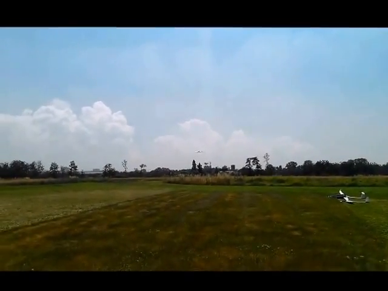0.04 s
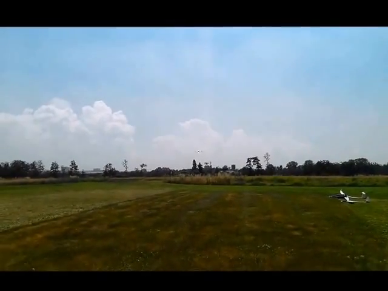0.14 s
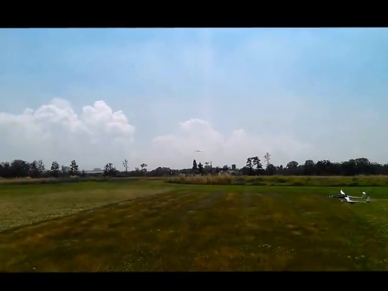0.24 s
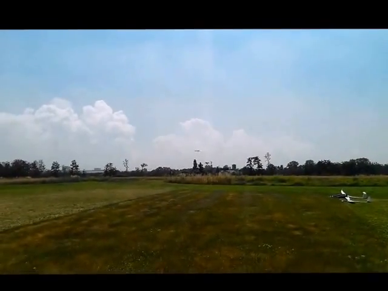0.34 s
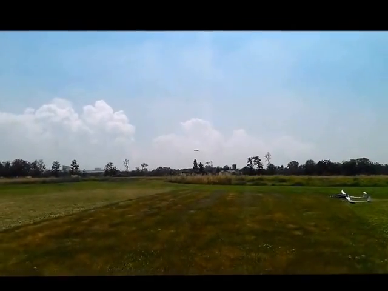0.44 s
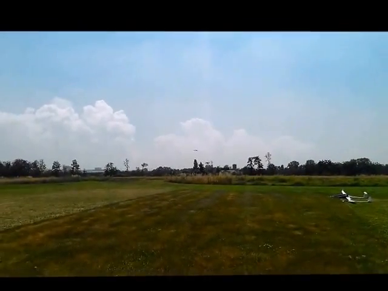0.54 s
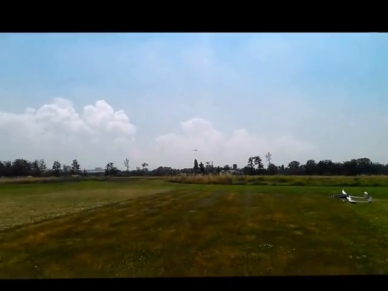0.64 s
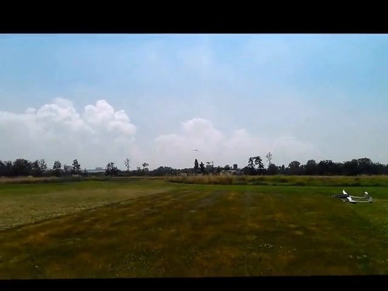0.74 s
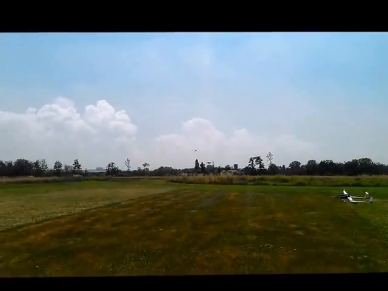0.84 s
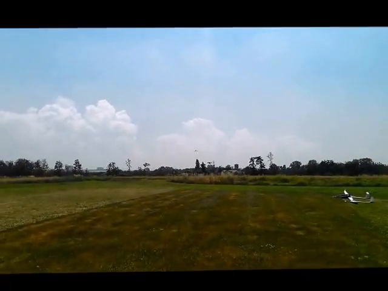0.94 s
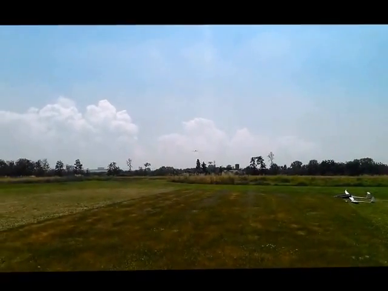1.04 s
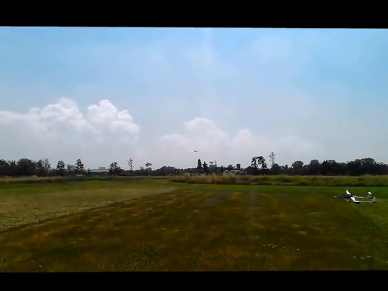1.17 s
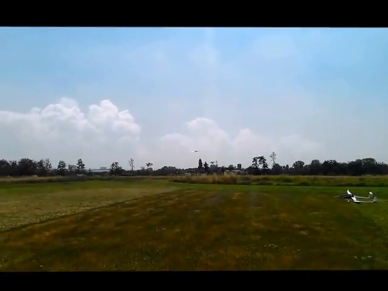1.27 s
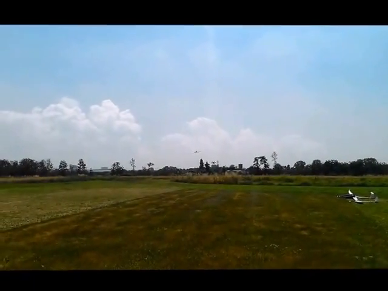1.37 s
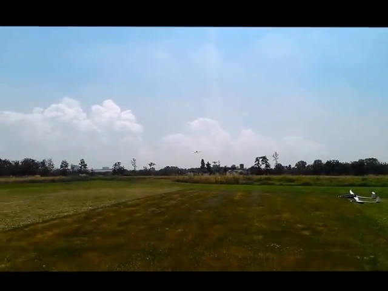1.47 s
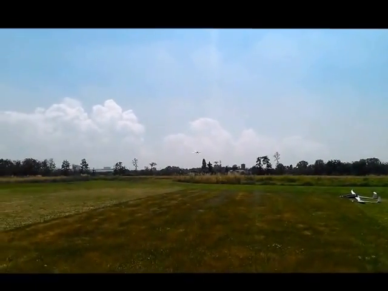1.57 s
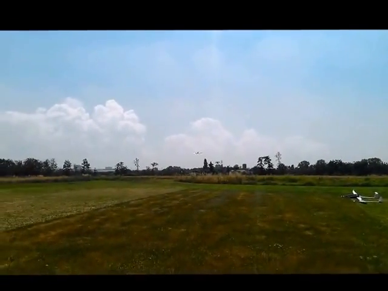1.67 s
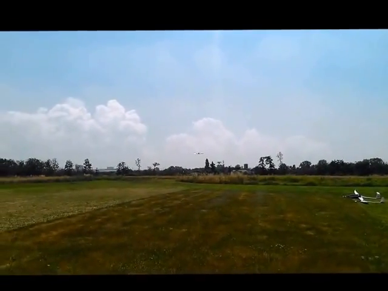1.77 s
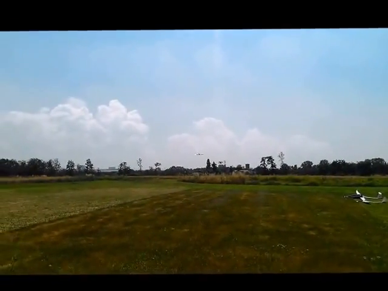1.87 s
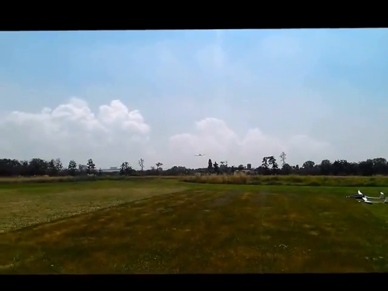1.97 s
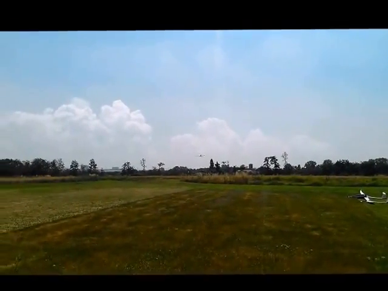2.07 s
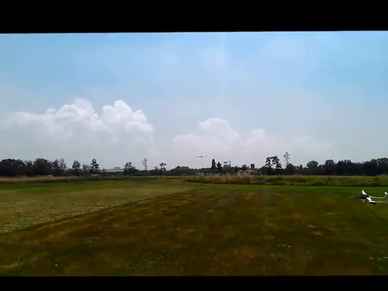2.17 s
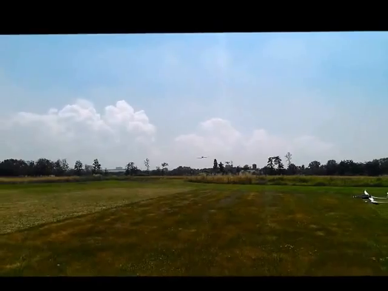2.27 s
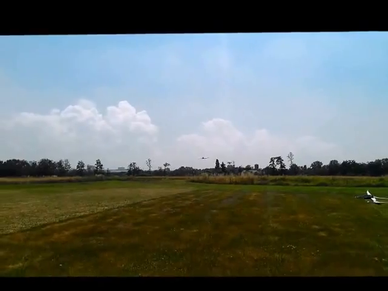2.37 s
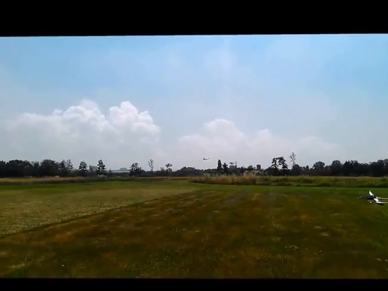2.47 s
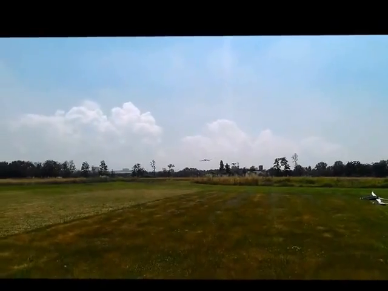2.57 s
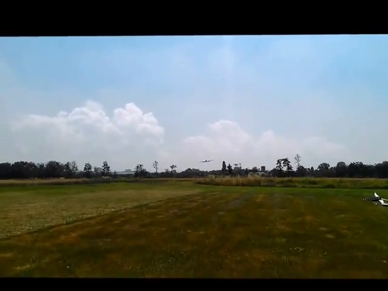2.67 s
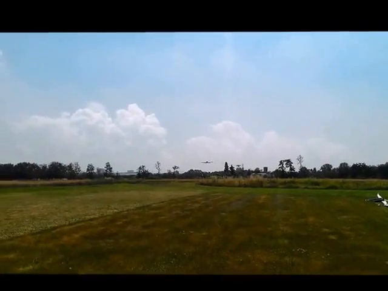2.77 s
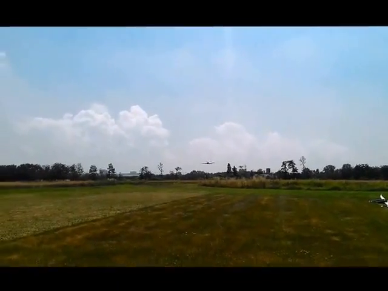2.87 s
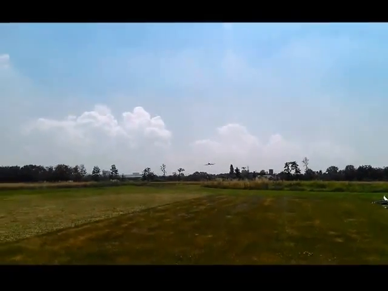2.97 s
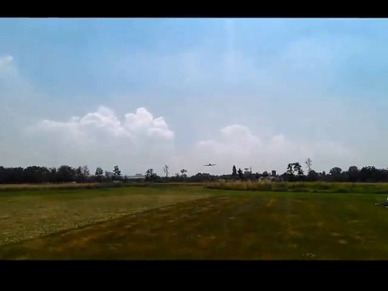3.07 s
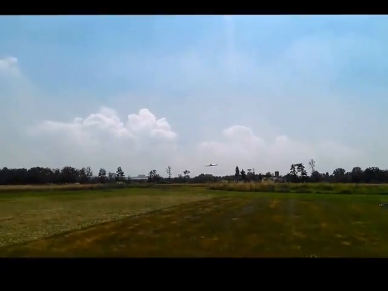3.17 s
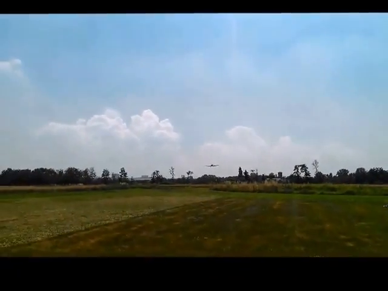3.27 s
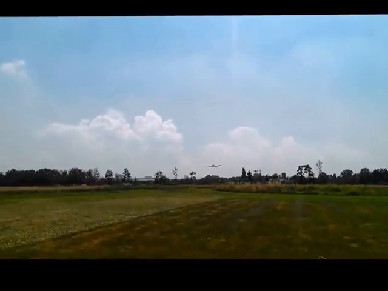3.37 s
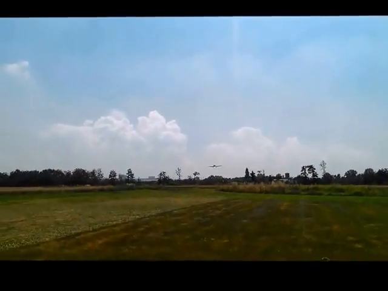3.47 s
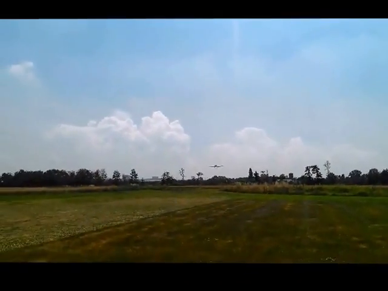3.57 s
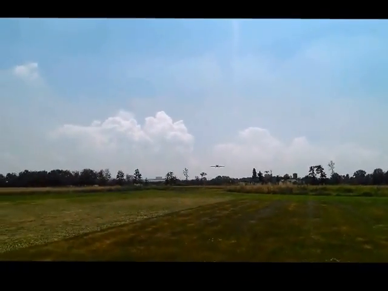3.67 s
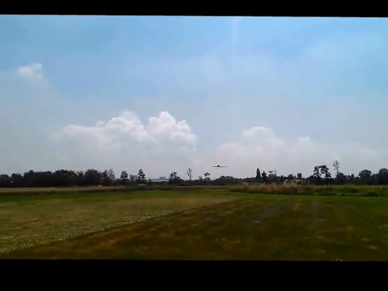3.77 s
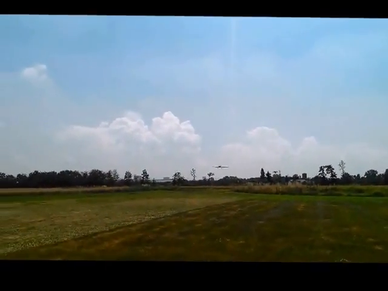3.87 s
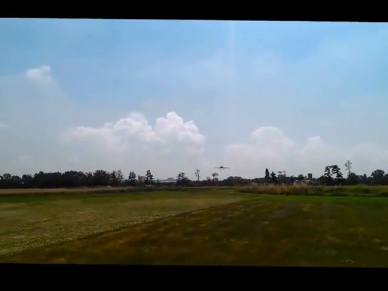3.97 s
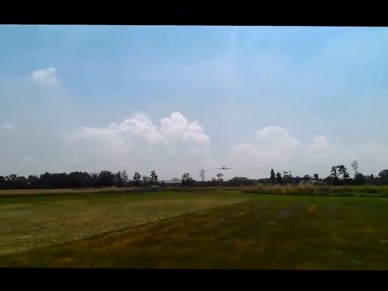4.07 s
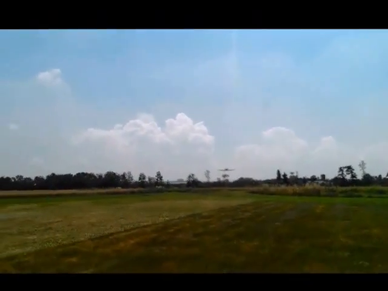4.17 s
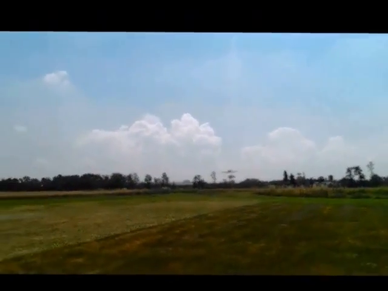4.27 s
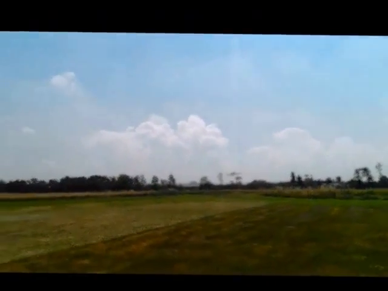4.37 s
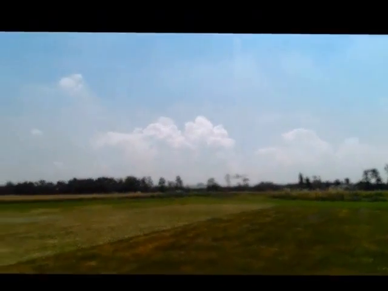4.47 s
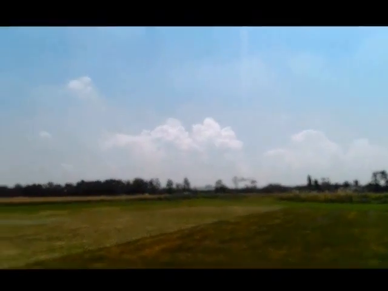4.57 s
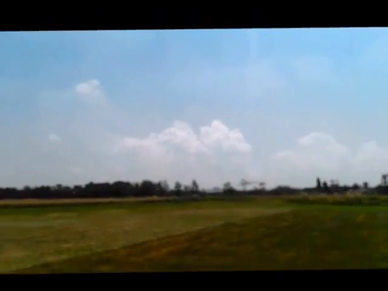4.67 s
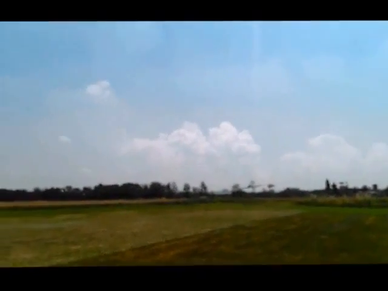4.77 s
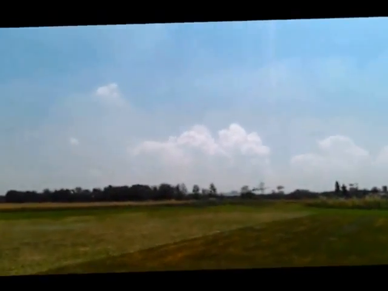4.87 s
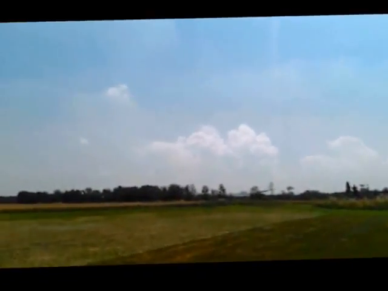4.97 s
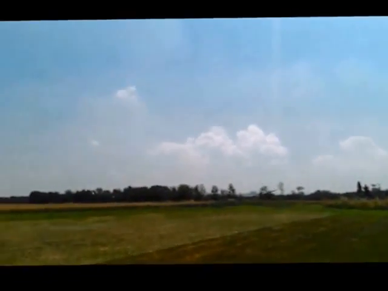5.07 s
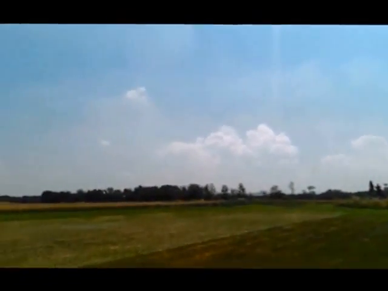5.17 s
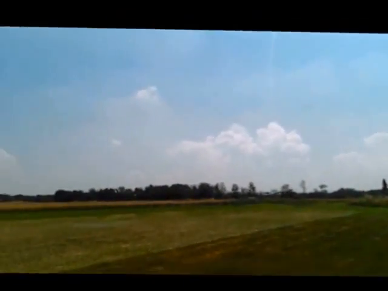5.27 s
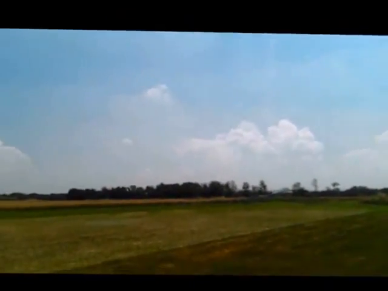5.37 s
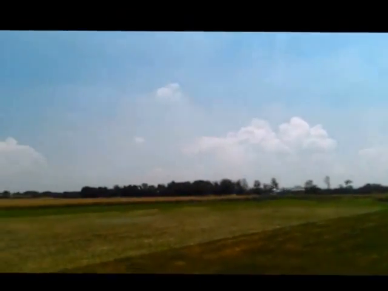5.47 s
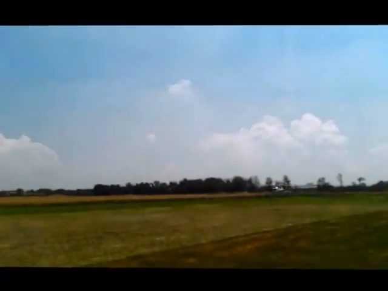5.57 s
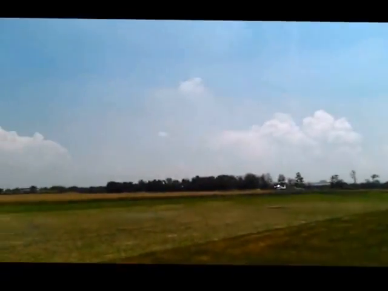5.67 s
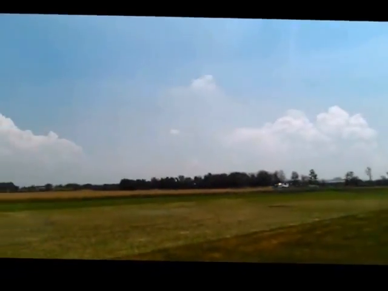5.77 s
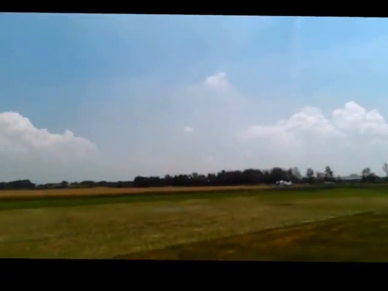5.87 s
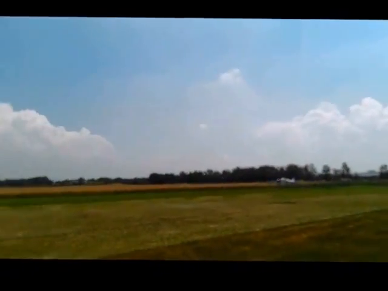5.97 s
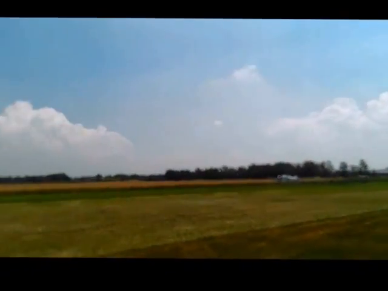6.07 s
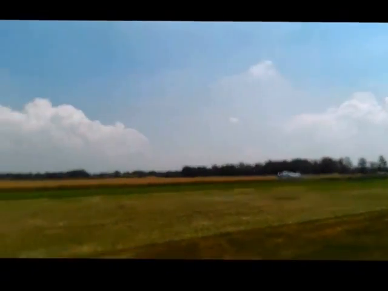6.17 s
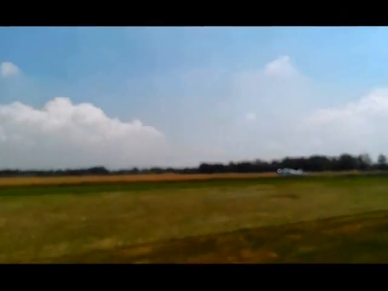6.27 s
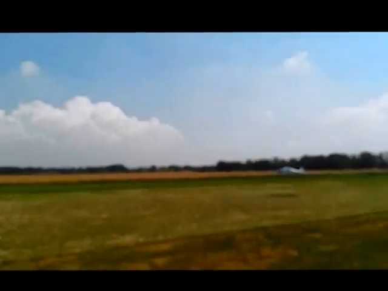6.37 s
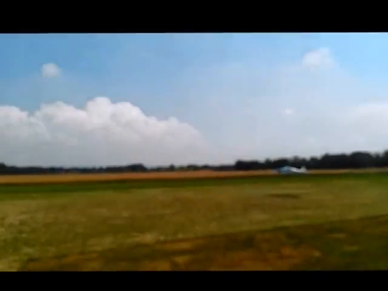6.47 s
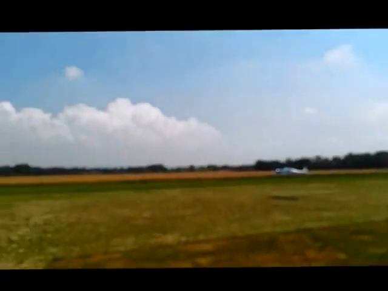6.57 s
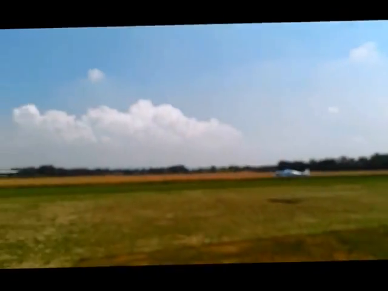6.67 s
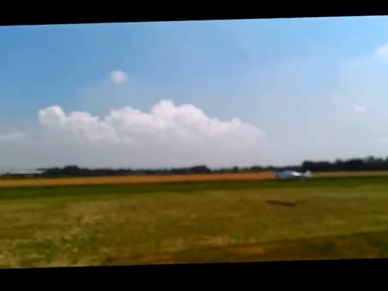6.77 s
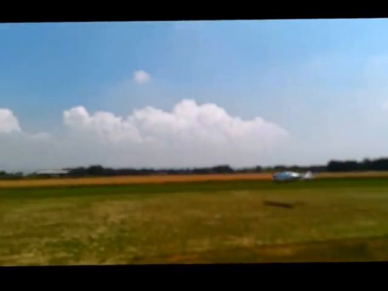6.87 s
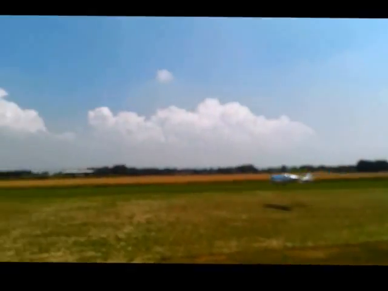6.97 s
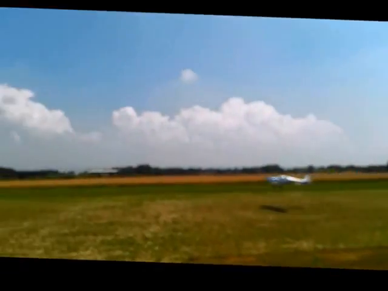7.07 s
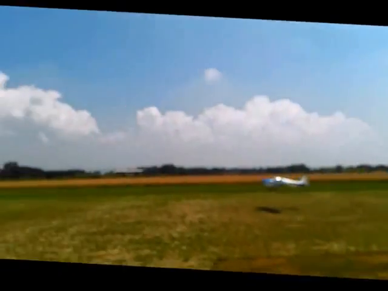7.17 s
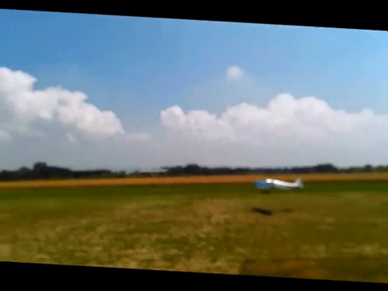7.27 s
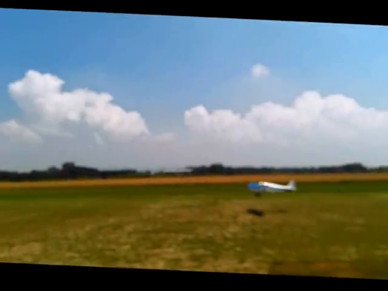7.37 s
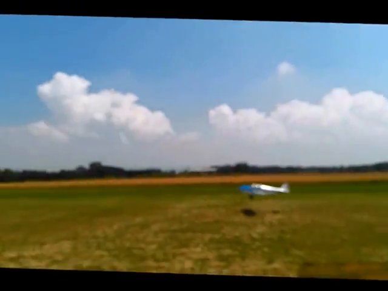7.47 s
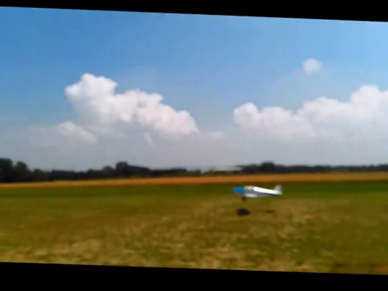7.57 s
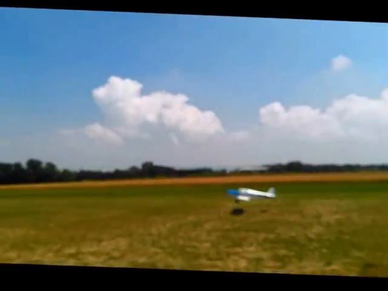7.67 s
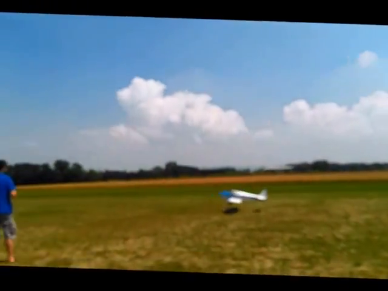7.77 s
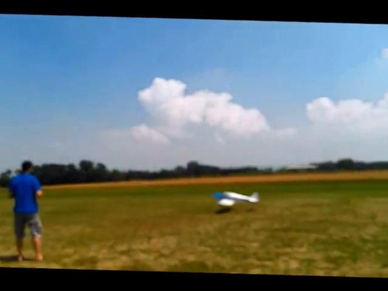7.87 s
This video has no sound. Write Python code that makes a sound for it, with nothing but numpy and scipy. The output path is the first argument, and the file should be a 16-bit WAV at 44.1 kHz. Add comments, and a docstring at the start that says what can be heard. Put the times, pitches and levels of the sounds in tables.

```python
"""The uneven popping of a small single-cylinder model aircraft engine runs throughout, idling towards
a landing over a grass field and coming nearer. It fires only every few turns: each firing pops and
thuds, the cold turns between puff through the muffler, and clicks and noise ring the airframe.
Wind buffets the two microphone ports, the left one far more: gusts of low lumpy noise, a ragged
flutter and a few knocks. A faint steady floor of field and microphone noise lies beneath."""
import sys
import numpy as np
from scipy import signal
from scipy.fft import rfft, irfft
from scipy.io import wavfile
from scipy.ndimage import uniform_filter1d

SR = 44100
rng = np.random.default_rng(int(sys.argv[2]) if len(sys.argv) > 2 else 0)


def generate_wav(sig):
    """Save sig (samples, or channels by samples) to the path in sys.argv[1] as 16-bit PCM at SR."""
    pcm = np.round(np.clip(np.atleast_2d(sig).T, -1, 1) * 32767).astype(np.int16)
    wavfile.write(sys.argv[1], SR, pcm)


N = 349713
TIME = np.arange(N) / SR  # seconds

# Firings of the engine. Each row: time in seconds (the pop's front is slightly later), relative strength in dB.
FIRINGS = [(0.073, -42), (0.161, -41.5), (0.266, -45), (0.355, -43), (0.479, -38), (0.551, -42.5),
           (0.567, -42), (0.638, -42.5), (0.657, -42.5), (0.744, -38), (0.833, -36.5), (0.942, -36),
           (1.014, -37), (1.124, -39), (1.212, -37.5), (1.303, -37), (1.322, -40.5), (1.414, -39.5),
           (1.433, -41.5), (1.525, -38.5), (1.634, -38), (1.725, -37.5), (1.818, -34.5), (1.91, -37),
           (1.928, -36), (2.021, -35), (2.114, -37.5), (2.186, -35.5), (2.205, -38), (2.297, -39.5),
           (2.315, -36), (2.405, -34.5), (2.496, -35.5), (2.587, -38), (2.676, -39.5), (2.748, -42),
           (2.769, -39), (2.858, -36.5), (2.931, -34), (3.021, -33.5), (3.113, -34), (3.202, -36.5),
           (3.294, -34.5), (3.386, -39), (3.405, -36), (3.479, -36.5), (3.57, -34.5), (3.588, -36.5),
           (3.681, -33), (3.831, -34), (4.087, -39.5), (4.205, -34.5), (4.33, -34), (4.451, -32),
           (4.557, -30.5), (4.66, -37), (4.723, -38), (4.743, -35), (4.765, -34.5), (4.848, -31.5),
           (4.976, -30.5), (5.08, -31.5), (5.21, -37), (5.275, -39.5), (5.296, -44), (5.359, -29),
           (5.489, -31), (5.598, -30.5), (5.621, -34), (5.728, -35.5), (5.749, -31), (5.877, -37),
           (5.9, -32.5), (6.013, -30), (6.102, -30), (6.213, -29), (6.329, -26.5), (6.418, -27),
           (6.537, -25), (6.656, -27.5), (6.679, -27), (6.82, -24), (6.895, -35.5), (6.918, -31),
           (6.941, -34), (6.965, -26.5), (7.06, -30.5), (7.086, -24), (7.11, -26), (7.182, -33),
           (7.205, -23), (7.228, -25), (7.301, -29), (7.323, -21.5), (7.417, -21), (7.509, -21.5),
           (7.579, -27), (7.602, -25), (7.624, -24.5), (7.717, -32), (7.739, -24), (7.833, -23),
           (7.857, -30.5)]
# Half-lit charges, a bare pop with no thud, placed on the nearest cold turn. Each entry: time in seconds.
SPUTTERS = [0.091, 0.371, 0.905, 0.923, 1.031, 1.139, 1.23, 1.45, 1.542, 1.837, 2.514, 2.605, 2.622, 2.641,
            2.659, 3.496, 3.793, 3.985, 4.165, 4.473, 4.701, 5.32, 6.124, 7.008, 7.395, 7.488]
# Crank speed, rounded to whole turns between firings. Each row: time in seconds, turns per second.
CRANK = [(0, 56.4), (1.5, 54.5), (3.6, 54.3), (4.3, 48.8), (5.5, 46.7), (6.7, 42.4), (7.93, 42.8)]
# The approach. Each row: time in seconds, relative muffler puff level in dB, relative hiss level in dB.
APPROACH = [(0, -60, -64), (1.1, -53, -55.5), (2.73, -54, -56), (3.15, -47, -58), (3.7, -49, -53.5),
            (4.1, -54, -53.5), (5, -44, -56), (5.8, -37, -55.5), (7.93, -27, -52.5)]
# Distance of the aircraft. Each row: time in seconds, nearness from 0 (far) to 1 (near).
NEARNESS = [(3.8, 0.0069), (7, 0.81)]
# Modes of exhaust and airframe. Each row: pitch far and near in Hz, width in Hz, relative pop level
# far and near in dB, relative hiss level far and near in dB, left-right difference far and near in dB.
BODY_MODES = [(760, 580, 360, -13, -12, -17, -1.5, -1, 0.5), (960, 773, 279, -11, -19.5, -3, -1.5, 3, 3),
              (1375, 1267, 142, -22.5, -20.5, -12, -1, 1.5, -6),
              (1523, 1456, 156, -21.5, -12.5, -17, -5, -6, 0.5),
              (1925, 1850, 153, -57, -27.5, -12.5, -7.5, -19, -14),
              (2366, 2030, 1390, -46.5, -24, -10.5, -12.5, -15, 8.5),
              (2796, 2675, 200, -46, -28.5, -26.5, -24, 26.5, -36),
              (3700, 3820, 360, -34, -13, -16.5, -14, -1, 22.5),
              (4336, 3710, 520, -16, -25, -18.5, -15.5, -5, -33),
              (4920, 4450, 600, -51, -49, -16, -19.5, -10, -29.5),
              (5580, 5720, 1260, -59, -31, -32.5, -16, 22, 21.5),
              (6800, 7400, 1700, -57.5, -35, -40, -35, -4, -36),
              (10700, 11200, 3200, -59, -26.5, -49, -28, 12, -11)]
# The treble swells and sinks. Each row: time in seconds, then the change in dB of the 1.9 kHz mode,
# of the 2-3 kHz band and of the band above.
TREBLE = [(0, 11, 6, 10.5), (.85, 0.5, -6.5, 1), (1.5, -4, -13.5, -10), (2.1, 5, 2, 2), (2.7, -7, -5, -7.5),
          (3.2, 2, 3.5, 3.5), (4.1, 0, -6, 0), (5, 6, 5.5, -4), (5.45, 5, 12.5, 4), (6.1, 5, 7.5, -3),
          (6.6, -16.5, 4.5, -0.5), (7.2, -1.5, -5, -8), (7.93, -1, -0.5, -8)]
# Gusts on the left port. Each row: time of the peak in seconds, relative peak in dB, length in seconds.
GUSTS = [(0.023, -27.5, 0.46), (0.586, -29, 0.14), (0.995, -30.5, 0.35), (1.435, -22.5, 0.047),
         (1.641, -32.5, 0.025), (1.798, -32.5, 0.16), (2.054, -33.5, 0.13), (4.544, -30, 0.098),
         (4.99, -30, 0.16), (5.566, -16, 0.065), (5.751, -22.5, 0.22), (5.989, -19.5, 0.047),
         (6.898, -18, 0.2), (7.13, -18, 0.07), (7.342, -25, 0.31)]
# Wind between the gusts. Each row: time in seconds, relative level at left and right ports in dB.
BREEZE = [(0, -36, -49), (1.1, -35, -58), (1.5, -51, -50), (4, -64, -65.5), (4.6, -45, -60),
          (5.7, -40.5, -38), (6.3, -73, -60), (7, -38.5, -58), (7.5, -26, -29)]
# Sharp knocks of wind on the left port. Each row: time in seconds, relative peak in dB.
KNOCKS = [(0.445, -31), (1.067, -32), (5.554, -26.5), (6.939, -25)]
# Spectrum of the buffeting. Each row: frequency in Hz, relative level in dB per Hz.
BUFFET = [(40, -7.5), (65, 3.5), (110, 0.5), (200, -10), (320, -20.5), (500, -33.5), (900, -87)]
# Spectrum of field and microphone noise. Each row: frequency in Hz, relative level in dB per Hz.
AIR = [(200, 2), (5000, -23.5), (14000, -33.5)]

SPUTTER_DB, BEFORE_DB = 17, 11.5  # boost of a half-lit turn, and of the turn that leads up to a firing
AFTER_DB, AFTER_S = 26, 0.02  # left-over charge lights on the next turns: boost, dying time
DIP_AT_S, DIP_S, DIP_DB = 2.73, 0.02, 10  # the hiss dips briefly
WANDER = 0.02  # the high modes change pitch from one firing to the next (share)
GUST_RISE, GUST_DROP_DB = 0.46, 14  # share of the length spent rising; fall over one length
AIR_DB = -60  # rms of the floor ahead of the microphones' filters
EDGE_HZ = 15100  # upper band limit


def engine():
    """Firings and cold turns drive the muffler, the exhaust and the airframe."""
    firing_s, strength_db = np.transpose(FIRINGS)
    firing_s = firing_s + 0.001664  # the front of the pop
    full_db = strength_db - uniform_filter1d(strength_db, size=9)  # fuller than its neighbours
    puff_db, hiss_db = follow(APPROACH)
    near = follow(NEARNESS)[0]
    turns, cold_s = crank(firing_s)
    out = muffler(firing_s, strength_db, full_db, cold_s, puff_db, near)
    sources = charges(firing_s, strength_db, full_db, cold_s, hiss_db, near)
    return out + body(sources, firing_s, turns, near)


def crank(fired):
    """Turns counted through time, whole at each firing, and the moments of the cold turns."""
    marks = np.r_[fired[0] - 1, fired, fired[-1] + 1]
    speed = np.interp(marks[1:], *np.transpose(CRANK))
    gaps = np.maximum(np.round(np.diff(marks) * speed), 1)
    whole = np.r_[0, np.cumsum(gaps)]
    cold_turns = np.setdiff1d(np.arange(whole[-1]), whole)
    cold = np.interp(cold_turns, whole, marks)
    return np.interp(TIME, marks, whole), cold[(cold > 0) & (cold < TIME[-1])]


def muffler(firing_s, strength_db, full_db, cold_s, puff_db, near):
    """Unburnt charge pumps the muffler once a turn; a hot charge thuds lower."""
    jitter_s = 0.0002 * rng.standard_normal(len(cold_s))
    pump_db = 3 * rng.standard_normal(len(cold_s))
    pumps = -clicks(cold_s + jitter_s, gain_of(pump_db))
    pumps = pumps - clicks(firing_s, gain_of(-4.0))
    low = steep(pumps, 212 - 24 * near, 43.9)
    high = gain_of(-15.0 + 10 * near) * steep(pumps, 317, 97)
    puffs = gain_of(puff_db + 12.5) * (low + high)
    # its deeper note carries less far
    puffs += gain_of(puff_db - 34.0 + 13 * near) * steep(pumps, 150.0, 24)
    # a fuller charge thuds more than in proportion
    knocks = clicks(firing_s + 0.0012, gain_of(strength_db + 0.2 * full_db))
    thud = gain_of(1.5 + 8.1 * near) * ring(knocks, 185.0, 59.0)
    return heard(puffs + thud, 1.4, 8)


def cough_levels(firing_s, cold_s):
    """Cold turns cough faintly, louder beside a firing and loudest when half lit (dB)."""
    coming = np.searchsorted(firing_s, cold_s)
    since = cold_s - firing_s[np.maximum(coming - 1, 0)]
    until = firing_s[np.minimum(coming, len(firing_s) - 1)] - cold_s
    after_db = AFTER_DB * np.exp(-(since / AFTER_S) ** 2)
    before_db = BEFORE_DB * (np.abs(until) < 0.028)
    cough_db = np.maximum(after_db, before_db) + 3 * rng.standard_normal(len(cold_s))
    cough_db[np.abs(cold_s[:, None] - SPUTTERS).argmin(axis=0)] = SPUTTER_DB
    return cough_db


def charges(firing_s, strength_db, full_db, cold_s, hiss_db, near):
    """Burning charges make rounded pops, noise bursts, a slow rasp and a hiss that flares."""
    coughs = clicks(cold_s, gain_of(cough_levels(firing_s, cold_s)))
    pops = clicks(firing_s, gain_of(strength_db)) + gain_of(hiss_db - 3.0) * coughs
    pops = uniform_filter1d(uniform_filter1d(pops, size=9), size=9)  # a rounded front

    crack_db = strength_db + rng.standard_normal(len(firing_s))
    cracks = clicks(firing_s, gain_of(crack_db)) + gain_of(hiss_db - 7.0) * coughs
    burst = gain_of(-29.5) * fade(fade(cracks, 0.00057), 0.0043)  # swells, then dies

    # a lean charge burns slowly
    slow = clicks(firing_s + 0.004, gain_of(strength_db - 0.6 * full_db))
    rasp = gain_of(-24.0 + 13.0 * near) * fade(uniform_filter1d(slow, size=300), 0.002)

    flare = fade(clicks(firing_s, gain_of(full_db)), 0.021)  # after each firing
    dip = gain_of(-DIP_DB * np.exp(-((TIME - DIP_AT_S) / DIP_S) ** 2))
    hiss = gain_of(hiss_db) * evened(1 + 0.69 * flare) * dip
    return pops, burst, rasp, hiss


def body(sources, firing_s, turns, near):
    """Pops, bursts, rasp and hiss ring the modes of the exhaust and airframe."""
    pops, burst, rasp, hiss = sources
    low_db, mid_db, top_db = follow(TREBLE)
    firing = np.searchsorted(firing_s, TIME)  # firings so far
    turn = (turns - turns[0]).astype(int)
    out = np.zeros((2, N))
    for hz, near_hz, width, *db in BODY_MODES:
        pop_db, air_db, pan_db = (far + (close - far) * near for far, close in np.reshape(db, (3, 2)))
        high = hz > 2200
        noise = rng.standard_normal((3, N))
        unit = np.sqrt(8 * np.pi * width / SR)  # gives ringing noise rms 1

        # a rattling burst shakes the high modes, a clean pop the others
        blow = unit * burst * noise[0] if high else -gain_of(16.5) * pops
        # the slow burn roughens the middle ones
        blow = blow + unit * rasp * noise[1] * (1200 < hz < 2200)
        # no two charges strike a mode alike: a new level every 400 samples
        luck = np.repeat(noise[2, :N // 400 + 1], 400)[:N]
        blow = blow * gain_of((2.2 if high else 1.3) * luck)

        jump = WANDER * high * rng.standard_normal(len(firing_s) + 1)[firing]
        pitch = (hz + (near_hz - hz) * near ** 2) * (1 + jump)
        pitch = pitch * (1 + 0.012 * drift())  # every mode wavers slowly

        swell_db = top_db if hz > 3200 else mid_db if high else low_db * (hz > 1700)
        swell_db = swell_db + 1.3 * drift()
        air_db = air_db + 2.2 * noise[2, turn]  # each turn hisses louder or softer
        shared = gain_of(pop_db) * blow + unit * gain_of(air_db) * hiss * noise[0]
        apart = unit * gain_of(air_db - 6.5) * hiss * noise[1:]  # scattered by the air on its way
        mode = ring if hz < 900 else steep  # the pipe mode starts at once
        rung = mode(gain_of(swell_db) * (shared + apart), pitch, width)
        out += heard(rung, pan_db, 5 if hz < 3200 else 0)
    return out


def wind():
    """Low lumpy noise, unrelated at the two ports, with ragged flutter and a few knocks."""
    left_db, right_db = follow(BREEZE)
    level_db = np.array([gusts(left_db), right_db])
    lumps = evened(uniform_filter1d(uniform_filter1d(rng.standard_normal((2, N)), 700), 500))
    progress = TIME / TIME[-1]  # over time the wind has less rumble and more flutter
    rumble = evened(gain_of(2.9 * lumps) * coloured(BUFFET, (2, N)))
    out = gain_of(level_db - 7.8 * progress ** 2) * rumble
    out = out - progress ** 2 * signal.filtfilt(*signal.butter(2, 70, fs=SR), out)
    # strong gusts tear into a higher, more ragged flutter
    flutter = steep(rng.standard_normal((2, N)), 229, 247)
    ragged = evened(gain_of(6.9 * lumps[::-1]) * flutter)
    out += gain_of(1.4 * level_db + 8 * progress - 2.5) * ragged
    knock_s, peak_db = np.transpose(KNOCKS)
    out[0] += steep(clicks(knock_s, gain_of(peak_db + 22.5)), 233, 270)
    return out


def gusts(calm_db):
    """Each gust climbs to its peak and falls away more slowly, above the breeze."""
    peak_s, peak_db, length = np.transpose(GUSTS)[:, :, None]
    coarse = TIME[::64]
    t = coarse - peak_s
    shape_db = peak_db - GUST_DROP_DB * np.where(t < 0, -t / GUST_RISE, t) / length
    return np.maximum(np.interp(TIME, coarse, shape_db.max(axis=0)), calm_db)


def floor():
    """Steady coloured noise of the field and microphones, unrelated at the two ports."""
    return gain_of(AIR_DB) * coloured(AIR, (2, N))


def ring(x, hz, width_hz):
    """A mode whose pitch may glide: a click of size 1 becomes a dying sine of height 1."""
    turn = np.exp(2j * np.pi * np.cumsum(hz * np.ones(N)) / SR)
    decay = np.exp(-np.pi * width_hz / SR)
    return (turn * signal.lfilter([1], [1, -decay], x / turn + 1e-18)).imag


def steep(x, hz, width_hz):
    """The same mode twice over: a softer start and darker valleys beside it."""
    return ring(ring(x, hz, width_hz), hz, width_hz) * 2 * np.pi * width_hz / SR


def fade(x, s):
    """Each click leaves a tail that falls with time constant s."""
    return signal.lfilter([1], [1, -np.exp(-1 / (s * SR))], x)


def clicks(s, size):
    """A train of single samples."""
    train = np.zeros(N)
    np.add.at(train, np.clip((s * SR).astype(int), 0, N - 1), size)
    return train


def heard(x, pan_db, count):
    """The pair of ports: a level split, and the left late by count samples."""
    left, right = x * gain_of(np.array([[0.5], [-0.5]]) * pan_db)
    return np.array([np.roll(left, count), right])


def drift():
    """Slow chance, rms 1: the colour and pitch of each mode wander."""
    rates_hz = np.geomspace(0.3, 2.5, num=8)
    return evened(sum(np.sin(2 * np.pi * (f * TIME + rng.random())) for f in rates_hz))


def coloured(points, shape):
    """Noise of a given spectrum, rms 1."""
    f, db = np.transpose(points)
    hz = np.fft.rfftfreq(N, 1 / SR)
    gain = gain_of(np.interp(np.log(hz + 1), np.log(f), db))
    return evened(irfft(rfft(rng.standard_normal(shape)) * gain, N))


def follow(rows):
    """Every column of a curve, sample by sample."""
    s, *columns = np.transpose(rows)
    return [np.interp(TIME, s, c) for c in columns]


def evened(x):
    """Scales to rms 1."""
    return x / np.sqrt(np.mean(x ** 2) + 1e-20)


def gain_of(db):
    """Decibels to a factor."""
    return 10 ** (np.asarray(db) / 20)


def scene():
    """Engine, wind and a faint steady floor."""
    return engine() + wind() + floor()


def record(dry):
    """Low cut of the microphones, then the band limit."""
    cut = signal.sosfilt(signal.butter(4, 46, "high", fs=SR, output="sos"), dry)
    band = signal.firwin(511, EDGE_HZ, window=("kaiser", 9), fs=SR)
    return signal.oaconvolve(cut, band[None], "same")


dry = scene()
out = record(dry)
generate_wav(out)
```